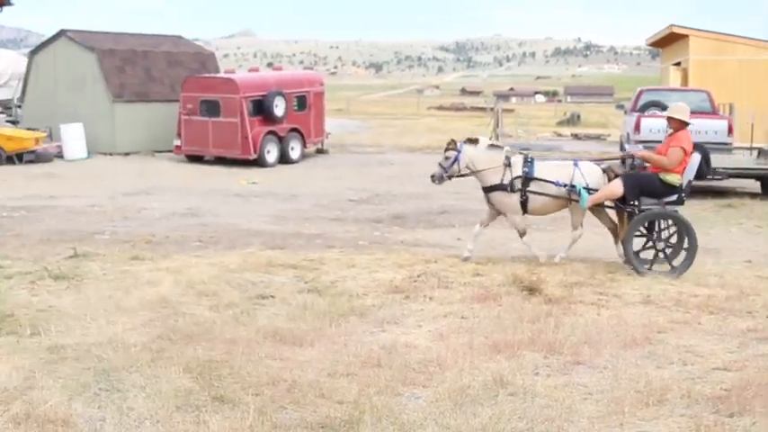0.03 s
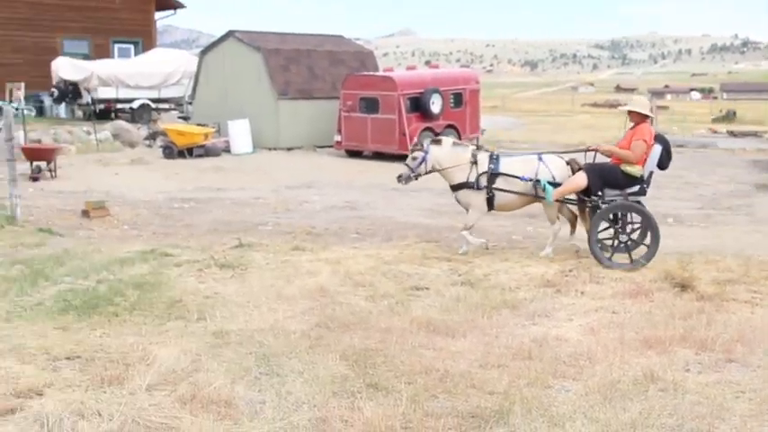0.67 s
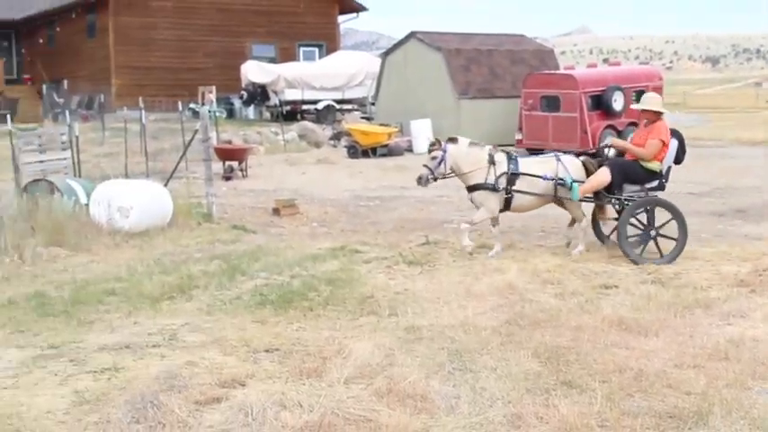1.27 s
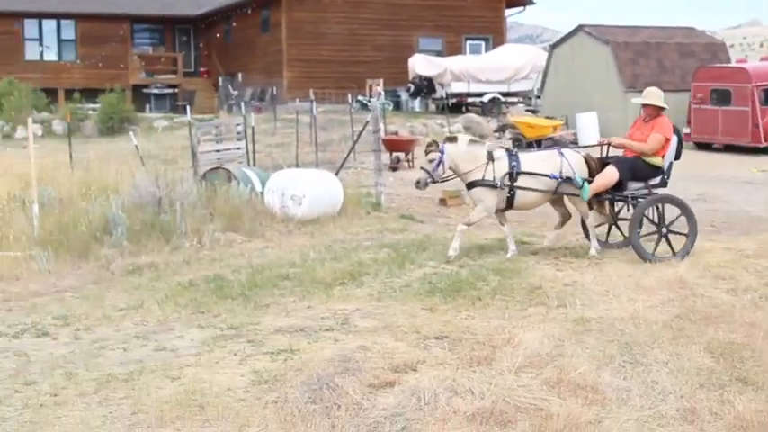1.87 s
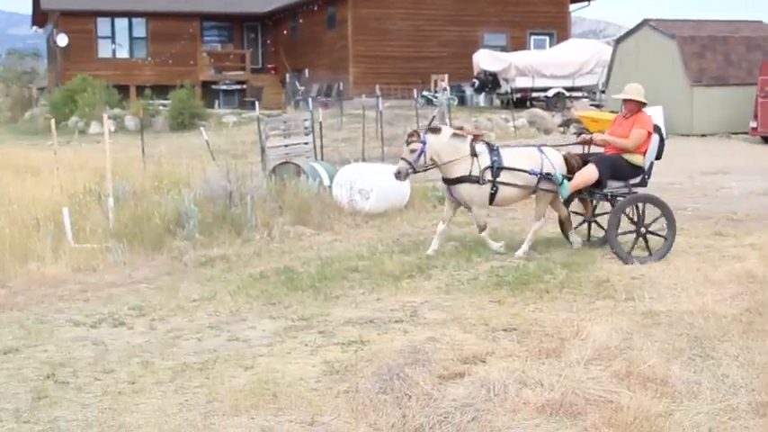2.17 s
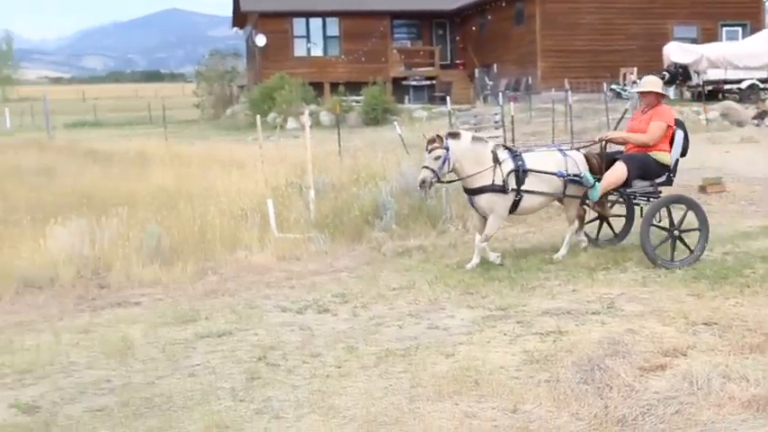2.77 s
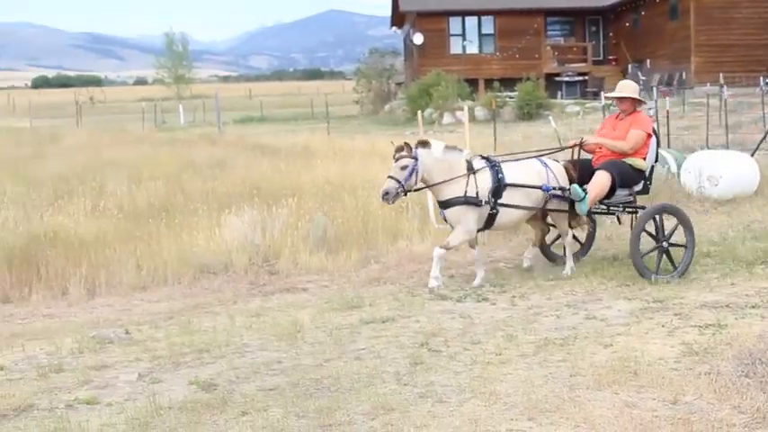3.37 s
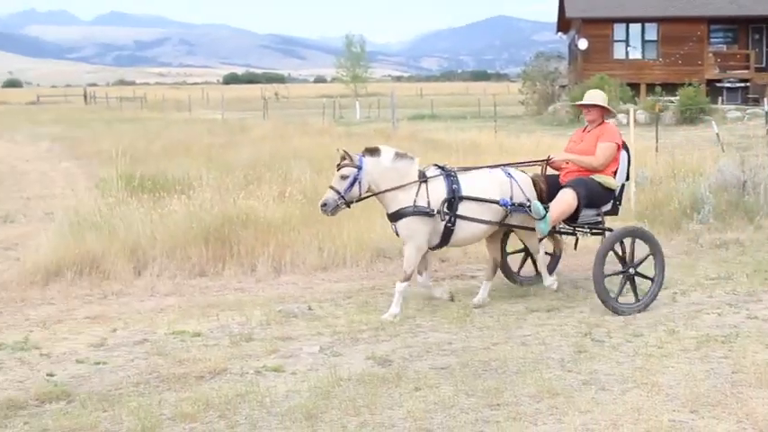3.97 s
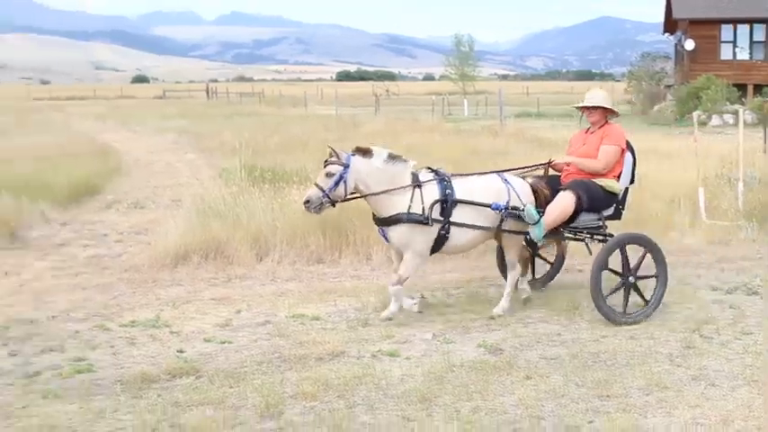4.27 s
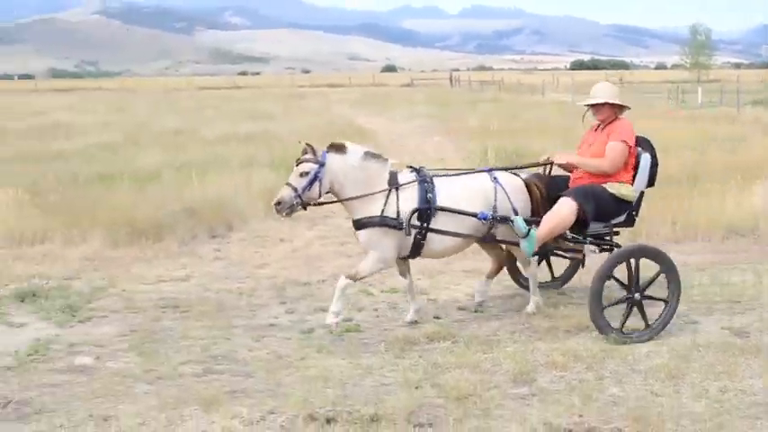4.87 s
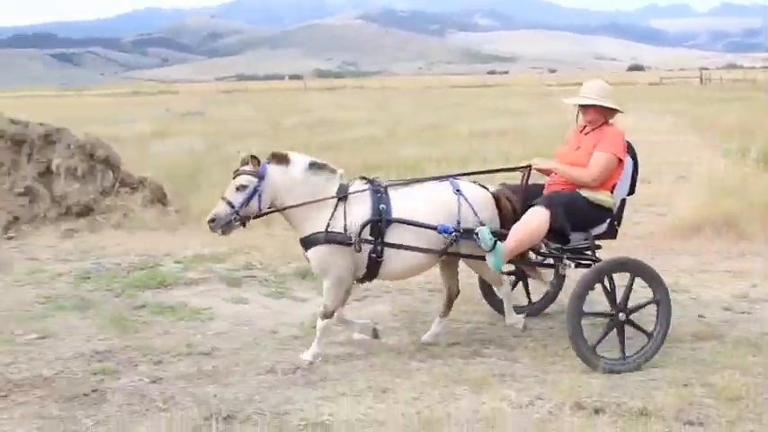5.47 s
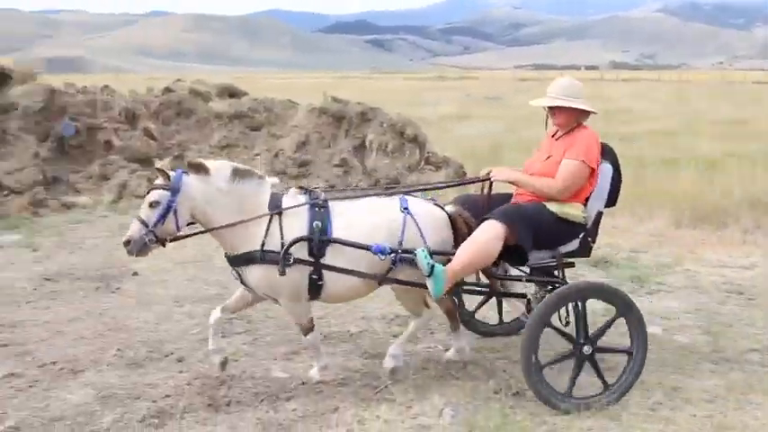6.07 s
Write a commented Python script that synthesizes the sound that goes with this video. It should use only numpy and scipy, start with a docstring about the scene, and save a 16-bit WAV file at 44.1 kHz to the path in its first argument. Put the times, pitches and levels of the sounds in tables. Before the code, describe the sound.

In an open field, a small cart rolls nearer behind a trotting pony, with gritty hoofbeats, a continuous tyre crunch and irregular clicks and rattles. Crickets trill faintly, and a thin grasshopper buzz fades about when the cart gives one hard, ringing knock. The rolling then becomes louder and crisper, with sharper clinks from the frame, while low gusts of wind buffet the microphone through the last third.

```python
"""A pony trots far off over dry grass and grit, pulling a two-wheeled cart: hooves scuff, tyres crunch,
and impacts and stick-slip friction make the cart knock and squeak. Crickets trill in a faint hiss.
Grasshoppers buzz, then fade after 2 s, as a hard knock leaves the frame ringing. From 3 s the cart
draws close and its crunch grows louder and brighter. From 4 s turbulent gusts rumble strongly on the
microphone, easing just before the end at 6 s."""
import sys
import numpy as np
from scipy import signal
from scipy.fft import rfft, irfft, next_fast_len
from scipy.io import wavfile

SR = 44100
rng = np.random.default_rng(int(sys.argv[2]) if len(sys.argv) > 2 else 0)


def wav_record(signal):
    """Record a signal, one row per channel, as 16-bit PCM in the file named by sys.argv[1]."""
    frames = np.transpose(np.atleast_2d(signal))
    bounded = np.clip(frames, -1, 1)
    # unit amplitude maps onto the largest positive 16-bit level
    quanta = np.round(bounded * 32767).astype(np.int16)
    wavfile.write(sys.argv[1], SR, quanta)


N = 270333
TIME = np.arange(N) / SR


# hoof landings, about four a second: t/s, level/dB, duration/s
LANDINGS = [(0.057, -50, 0.036), (0.232, -43, 0.051), (0.834, -44, 0.033), (1.066, -50.5, 0.058),
            (1.386, -55, 0.084), (1.667, -50, 0.02), (1.881, -46.5, 0.014), (2.47, -46.5, 0.04),
            (2.619, -42, 0.043), (2.858, -46, 0.071), (3.094, -46.5, 0.058), (3.347, -49, 0.028),
            (3.587, -49.5, 0.046), (3.855, -47, 0.041), (3.925, -42.5, 0.017), (4.055, -54, 0.029),
            (4.346, -51.5, 0.073), (4.593, -42.5, 0.046), (4.64, -40.5, 0.037), (4.7, -39.5, 0.031),
            (4.822, -43, 0.15), (5.081, -51, 0.013), (5.338, -44.5, 0.073), (5.814, -41.5, 0.041)]
def footfalls():
    """Paired excitation, a landing and a lighter flick: rows of t/s, body/dB, treble/dB, duration/s."""
    rows = []
    for s, db, length in LANDINGS:
        grit_db = by_distance(s, far=-56.5, near=-45)
        rows.append((s, db, grit_db, length))
        rows.append((s + 0.14, db - 15, grit_db - 1.5, 0.048))  # the hoof lifts through the grass
    return rows


# spectrum of a gritty scuff: f/Hz, level/dB
SCUFF_SPECTRUM = [(150, -3.5), (470, -2.5), (750, 6), (1150, 4.5), (1550, -2.5), (1900, 5), (2400, -6),
                  (3000, -7.5), (5500, -7.5), (6900, -8), (9000, -21.5), (15000, -41)]
# hollow modes of the cart, shaken by each step: f/Hz, bandwidth/Hz, level/dB
RATTLE_MODES = [(928, 94, 4.5), (1092, 68, -1), (1847, 194, 9.5), (3140, 92, -1)]
def hooves():
    """Forced vibration: each hoof crushes grit, and the swell of grains drives the modes of the cart."""
    out, t = np.zeros(N), np.arange(8192) / SR
    for s, body_db, treble_db, length in footfalls():
        u = t / length
        grit = crackle(len(t), per_s=2700, spread_db=1.5, decay_s=0.00056)
        grit = grit * u ** 0.33 * np.exp(-1.9 * u ** 2)
        scuff, treble = split(colour(grit, SCUFF_SPECTRUM))
        rattle = unit(sum(amp(db) * resonate(grit, hz, width) for hz, width, db in RATTLE_MODES))
        rattle_share = np.interp(s, [3.0, 4.2], [.72, .35])  # close by, the scuff covers more of it
        body = np.sqrt(1 - rattle_share) * scuff + np.sqrt(rattle_share) * rattle
        add(out, s, (amp(body_db) * body + amp(treble_db) * treble) * np.sqrt(length / t[-1]))
    return out


# impacts of loose joints: t/s, body level/dB, treble level/dB, joint f/Hz, chatter duration/s
JOINT_IMPACTS = [(0.058, -49, -50, 5800, 0.0023), (0.109, -53, -45.5, 5880, 0.0033),
                 (0.992, -39, -47.5, 1190, 0.01), (1.055, -46, -45.5, 5230, 0.009),
                 (1.368, -37, -62, 1280, 0.0044), (1.454, -44, -37, 6340, 0.0088),
                 (1.472, -36.5, -43.5, 1270, 0.011), (1.625, -47, -46, 1470, 0.0051),
                 (2.001, -51, -46.5, 4940, 0.0088), (2.25, -26, -32, 1800, 0.0072),
                 (2.284, -56, -42, 5000, 0.002), (2.695, -41.5, -41.5, 2930, 0.0065),
                 (2.707, -43, -42, 6900, 0.012), (2.975, -45, -45, 1110, 0.0083),
                 (3.322, -41.5, -63, 1500, 0.0027), (3.416, -42, -43.5, 6400, 0.0052),
                 (3.607, -42.5, -42.5, 4770, 0.0092), (3.914, -49, -40, 6620, 0.0018),
                 (4.174, -35.5, -35.5, 4660, 0.003), (4.328, -38, -37, 6600, 0.016),
                 (4.719, -44, -35.5, 6900, 0.0018), (4.81, -35.5, -23, 6760, 0.013),
                 (4.917, -38, -21, 7150, 0.0017), (5.495, -42, -42, 2050, 0.003),
                 (5.508, -37.5, -38, 6900, 0.0055), (5.807, -40.5, -39, 6650, 0.0064),
                 (5.886, -30, -40.5, 1180, 0.013), (5.932, -37.5, -35.5, 6360, 0.0086),
                 (5.978, -32.5, -26.5, 4860, 0.012), (6.057, -33, -45, 764, 0.002)]
# modes of the frame: f/Hz, level/dB, T60/s
FRAME_MODES = [(546, -17, 0.042), (830, -9, 0.079), (1240, 5.5, 0.012), (1815, 1, 0.043), (2170, 3, 0.0062),
               (2730, -12, 0.031), (3050, -6, 0.024), (4170, 1, 0.0081), (4700, 12, 0.0034),
               (6480, 1.5, 0.012), (7020, -6.5, 0.046), (8430, 1, 0.018)]
# radiation efficiency of the thin frame: f/Hz, level/dB
FRAME_RADIATION = [(150, -40), (350, -14), (600, -2.5), (1200, -3), (2700, 2), (7200, 6.5), (9500, -5),
                   (15000, -24)]
# single parts left ringing by a hard knock: t/s, level/dB, f/Hz, T60/s
RINGING_PARTS = [(2.252, -36.5, 5025, 0.28), (2.251, -25, 2730, 0.037), (2.253, -33, 1280, 0.045),
                 (3.369, -38, 790, 0.037), (4.812, -31, 4720, 0.079), (5.932, -29, 720, 0.057),
                 (5.981, -35, 4900, 0.086), (6.068, -31, 930, 0.34)]
def knocks():
    """Impact excitation: a joint chatters for milliseconds, and joint and frame ring in damped modes."""
    out, t = np.zeros(N), np.arange(4096) / SR
    for s, body_db, treble_db, joint_hz, chatter in JOINT_IMPACTS + ticks():
        u = t / chatter
        contacts = grains(len(t), per_s=12000, spread_db=-0.5) * u ** 0.056 * np.exp(-u ** 2)
        contacts[0] += 0.0085 / chatter  # a short knock is one clean blow
        ring = np.zeros(len(t))
        for hz, db, t60 in FRAME_MODES:
            detuned_hz = hz * (1 + rng.standard_normal() / 150)
            ring += amp(db - 60 * t / t60) * np.cos(2 * np.pi * detuned_hz * t)
        ring[0] += 30  # the bare click of the contact
        frame = unit(signal.fftconvolve(contacts, ring)[:len(t)])
        joint = resonate(contacts, joint_hz, width_hz=170 + 0.05 * joint_hz)
        scatter = 0.0079 * rng.standard_normal(len(t)) * amp(-60 * t / 0.18)  # off ground and cart
        scatter[0] = 1  # direct sound
        hit = signal.fftconvolve(frame + 0.35 * joint, scatter)[:len(t)]
        body, treble = split(colour(hit, FRAME_RADIATION))
        add(out, s, (amp(body_db) * body + amp(treble_db) * treble) * np.sqrt(0.0095 / t[-1]))
    t = np.arange(SR // 2) / SR
    for s, db, hz, t60 in RINGING_PARTS:
        add(out, s, amp(db - 60 * t / t60) * np.sin(2 * np.pi * hz * t))
    return out


# rolling noise, which snaps and ticks also follow: t/s, level/dB
ROLLING_LEVEL = [(0.0, -50.5), (0.32, -48), (0.94, -49.5), (1.45, -49), (2.01, -49.5), (2.59, -48),
                 (2.8, -47), (3.65, -47), (3.84, -46), (3.99, -44), (4.61, -45), (4.85, -39.5),
                 (5.09, -41.5), (5.82, -41.5), (6.04, -39.5), (6.13, -38.5)]
# tyre spectra far off and close by: f/Hz, level/dB
TYRE_FAR = [(180, -10.5), (300, -0.5), (482, -4.5), (691, 2), (975, -3.5), (1090, 2.5), (1570, -0.5),
            (1910, 2), (2320, -5.5), (4850, -5.5), (5620, -9), (6730, -4), (8050, -10.5), (9800, -14),
            (15000, -34)]
TYRE_NEAR = [(300, -4), (480, -6.5), (700, 2), (1100, -5.5), (1900, -0.5), (2500, -5.5), (3500, -5.5),
             (4800, 0.5), (5600, -5), (6900, 3), (8000, -4), (9500, -15), (12000, -24.5), (15000, -40)]
def tyres():
    """Rolling noise: many small fractures of dry grass add up to a crunch, brighter as the cart nears."""
    clumps = amp(wander(rate_hz=34))
    stalks = crackle(N, per_s=1100, spread_db=3.5, decay_s=0.00077)
    crunch = clumps * (stalks + 0.92 * rng.standard_normal(N))
    far_body, far_treble = split(colour(crunch, TYRE_FAR))
    near_body, near_treble = split(colour(crunch, TYRE_NEAR))
    nearness = by_distance(TIME, far=0, near=1)
    body = unit((1 - nearness) * far_body + nearness * near_body)
    treble = unit((1 - nearness) * far_treble + nearness * near_treble)
    body *= amp(by_distance(TIME, far=-3.5, near=-4.5))
    treble *= amp(by_distance(TIME, far=-7, near=-5))
    uneven_ground_db = 0.93 * wander(rate_hz=6.3)
    return (body + treble) * amp(curve(ROLLING_LEVEL) + uneven_ground_db)


# spectrum of a snapping stalk: f/Hz, level/dB
SNAP_SPECTRUM = [(300, -33), (1500, -6), (3500, -2), (7000, 7), (10000, -6), (12000, -18), (15000, -51)]
def snaps():
    """Brittle fracture: single stalks break under hooves and tyres, each with a bright tick."""
    breaks = crackle(N, per_s=18, spread_db=0.5, decay_s=0.0019)
    level_db = curve(ROLLING_LEVEL) + by_distance(TIME, far=-14.5, near=-20.5)
    return unit(colour(breaks, SNAP_SPECTRUM)) * amp(level_db)


def ticks(per_s=2.5, spread_db=2.5, chatter_s=0.0064):
    """Random impacts of buckles and small fittings, louder close by: rows as in JOINT_IMPACTS."""
    gap, force, pitch = rng.random((60, 3)).T
    times = np.cumsum(.3 + 1.4 * gap) / per_s
    levels = np.interp(times, TIME, curve(ROLLING_LEVEL)) + spread_db * (2 * force - 1)
    pitches_hz = np.interp(pitch, [0, 1], [1870, 6800])
    return [(s, db - 4, db - 3.5, hz, chatter_s)
            for s, db, hz in zip(times, levels, pitches_hz) if s < TIME[-1]]


# dry rubs of springs and harness: t/s, level/dB, f/Hz, duration/s
RUBS = [(0.314, -49.5, 1320, 0.061), (0.597, -47.5, 3500, 0.063), (0.725, -52.5, 1360, 0.064),
        (1.102, -57, 1350, 0.088), (1.601, -52.5, 1420, 0.036), (1.934, -55, 3580, 0.041),
        (1.976, -55.5, 1400, 0.061), (2.2, -54, 1370, 0.057), (3.958, -48.5, 3380, 0.037),
        (6.059, -47.5, 910, 0.038)]
def squeaks():
    """Stick-slip friction: a short dry scrape leads into one rough resonance that sags in pitch."""
    out = np.zeros(N)
    for s, db, hz, length in RUBS:
        u = np.arange(round(2 * length * SR)) / (length * SR)
        slips = rng.standard_normal(len(u))
        rub = resonate(slips, hz * (1.03 - 0.03 * u), width_hz=0.25 * hz)
        scrape = 1.2 * np.exp(-u / 0.59) * resonate(slips, 0.83 * hz, width_hz=0.87 * hz)
        add(out, s - .004, amp(db) * unit((rub + scrape) * u * np.exp(-2.2 * u ** 2)))
    return out


# breeze between gusts: t/s, level/dB
BREEZE_LEVEL = [(0, -63), (0.6, -75), (0.9, -73), (2.2, -73), (2.8, -52), (3.5, -78), (3.8, -58.5),
                (4.2, -49), (5.3, -46), (5.8, -53), (6.13, -70)]
# Gaussian gusts: peak t/s, level/dB, 1/e half-width/s
GUST_PEAKS = [(0.383, -49, 0.042), (0.566, -42, 0.022), (1.831, -47, 0.024), (2.6, -65, 0.067),
              (2.778, -41.5, 0.037), (2.961, -45, 0.022), (3.112, -45, 0.035), (3.929, -40, 0.033),
              (4.145, -34.5, 0.054), (4.313, -36, 0.089), (4.543, -37, 0.014), (4.723, -37.5, 0.03),
              (5.053, -30, 0.053), (5.363, -29, 0.035), (5.614, -29.5, 0.025), (5.726, -35.5, 0.05)]
# spectrum of the eddies: f/Hz, level/dB
EDDY_SPECTRUM = [(12, -21), (30, -22), (60, -6), (110, 2), (160, -1.5), (230, -10), (330, -16.5),
                 (430, -34), (800, -45), (2000, -66)]
# sudden low buffets: t/s, relative level/dB, f/Hz
WIND_BUFFETS = [(0.746, -46, 270), (2.319, -43, 260), (2.567, -44.5, 240), (3.378, -43, 98),
                (3.613, -43.5, 171), (4.057, -35.5, 200), (4.324, -24.5, 150), (5.385, -34.5, 220),
                (5.819, -34, 203), (6.06, -38, 227)]
def wind():
    """Turbulence: pressure fluctuations at the microphone rumble with each gust and thump in buffets."""
    gust_power = sum(amp(db) ** 2 * np.exp(-((TIME - s) / half) ** 2) for s, db, half in GUST_PEAKS)
    wind_db = 10 * np.log10(amp(curve(BREEZE_LEVEL)) ** 2 + gust_power)
    eddies = unit(colour(rng.standard_normal(N), EDDY_SPECTRUM))
    eddies *= amp(wind_db - 6 + 2 * wander(rate_hz=21))
    deep_db = np.minimum(wind_db - 3.5, -50)  # the deepest rumble stops growing in strong gusts
    deep = resonate(rng.standard_normal(N), hz=55.7, width_hz=69) * amp(deep_db)
    out = eddies + deep
    t = np.arange(4096) / SR
    u = t / 0.0078  # a buffet peaks after 7.8 ms
    for s, db, hz in WIND_BUFFETS:
        thump = unit(resonate(rng.standard_normal(len(t)), hz, width_hz=178) * u * np.exp(1 - u))
        add(out, s - .005, amp(db - 12) * thump)
    return out


# spectrum of the open air: f/Hz, level/dB
AIR_SPECTRUM = [(24, -20), (40, 2.5), (401, -3), (1570, -6.5), (1820, -9), (2520, -10.5), (2990, -37),
                (3390, -19), (6620, -10), (11400, -38), (15000, -36)]
def air():
    """Ambient noise: a faint, steady broadband hiss."""
    return amp(-59.5) * unit(colour(rng.standard_normal(N), AIR_SPECTRUM))


# trill of distant crickets: t/s, level/dB
CRICKET_LEVEL = [(0, -61.5), (1.5, -60.5), (2.8, -71), (4, -61), (6.13, -80)]
def crickets():
    """Superposition: the nearest cricket is a thin tone, and the rest merge into narrow-band noise."""
    nearest = np.sin(2 * np.pi * np.cumsum(2958 + 7 * wander(rate_hz=17.3)) / SR)
    chorus = resonate(rng.standard_normal(N), hz=2967, width_hz=100)
    return amp(curve(CRICKET_LEVEL)) * (nearest + 0.34 * chorus)


# buzz of two grasshoppers: t/s, level of the lower/dB, level of the higher/dB
GRASSHOPPER_LEVELS = [(0, -73, -88), (1.25, -73, -84), (1.5, -64.5, -74), (1.905, -60.5, -76),
                      (1.925, -72, -73), (2.35, -84, -73), (2.6, -97, -92), (6.13, -94, -95)]
def grasshoppers():
    """Stridulation: each stroke of leg on wing modulates the amplitude of two high noise bands."""
    stroke_hz = 40.5 + .6 * wander(rate_hz=5)
    rasp = unit(1 + 0.53 * np.cos(2 * np.pi * np.cumsum(stroke_hz) / SR))
    lower = resonate(rng.standard_normal(N), hz=10900, width_hz=3600) * amp(curve(GRASSHOPPER_LEVELS, 1))
    higher = resonate(rng.standard_normal(N), hz=13100, width_hz=1700) * amp(curve(GRASSHOPPER_LEVELS, 2))
    return rasp * (lower + higher)


def by_distance(s, far, near):
    """Linear transition from the far value to the near one as the cart approaches."""
    return np.interp(s, (3.07, 5.63), (far, near))


def grains(size, per_s, spread_db):
    """Poisson process: clicks of random size and sign at random times."""
    sizes = amp(spread_db * np.minimum(rng.exponential(1, size), 4.5))
    return unit(sizes * rng.choice([-1, 1], size) * (rng.random(size) < per_s / SR))


def crackle(size, per_s, spread_db, decay_s):
    """Acoustic emission: each splintering stalk gives a tiny, exponentially decaying noise burst."""
    retention = np.exp(-1 / (decay_s * SR))
    power = signal.lfilter([1], [1, -retention], grains(size, per_s, spread_db) ** 2)
    return unit(np.sqrt(power) * rng.standard_normal(size))


def resonate(x, hz, width_hz):
    """Resonance: two one-pole stages centred on hz, which may be a curve."""
    turn = np.exp(2j * np.pi * np.cumsum(hz * np.ones(len(x))) / SR)
    r = np.exp(-np.pi * width_hz / SR)
    return unit((turn * signal.lfilter([1], [1, -2 * r, r * r], x / turn)).real)


def colour(x, spectrum):
    """Causal filtering: the phase follows from the log gain by the Hilbert transform."""
    size = next_fast_len(len(x) + 2048) * 2
    hz, db = np.transpose(spectrum)
    log_hz = np.log(abs(np.fft.fftfreq(size, 1 / SR)) + 1)
    log_gain = np.log(amp(np.interp(log_hz, np.log(hz), db)))
    response = np.exp(np.conj(signal.hilbert(log_gain)))
    return np.fft.ifft(np.fft.fft(x, size) * response).real[:len(x)]


def split(x, crossover_hz=3000):
    """Crossover filtering into body and treble, each at rms 1."""
    return [unit(signal.sosfilt(signal.butter(4, crossover_hz, kind, fs=SR, output="sos"), x))
            for kind in ("low", "high")]


def wander(rate_hz):
    """Low-pass noise: a smooth random fluctuation of rms 1."""
    hz = np.fft.rfftfreq(N, 1 / SR)
    return unit(irfft(rfft(rng.standard_normal(N)) * np.exp(-(hz / rate_hz) ** 2), N))


def curve(rows, column=1):
    """Linear interpolation of one table column in time."""
    rows = np.array(rows, float)
    return np.interp(TIME, rows[:, 0], rows[:, column])


def amp(db):
    """Decibels to amplitude ratio."""
    return 10 ** (np.asarray(db) / 20)


def unit(x):
    """Normalisation to rms 1."""
    return x / np.sqrt(np.mean(x ** 2) + 1e-20)


def add(mix, s, sound):
    """Superposes a sound on the mix at time s."""
    part = mix[max(0, round(s * SR)):][:len(sound)]
    part += sound[:len(part)]


def scene():
    """Superposition of pony, cart, wind and field at one microphone."""
    pony_and_cart = amp(-1.6) * knocks() + amp(-0.14) * hooves() + squeaks() + tyres() + snaps()
    return (pony_and_cart + wind() + air() + crickets() + grasshoppers())[None]


def record(dry):
    """Band limiting: a linear-phase low-pass at 15.4 kHz."""
    lowpass = signal.firwin(511, 15400, window=("kaiser", 9), fs=SR)
    return signal.oaconvolve(dry, lowpass[None], "same")


dry = scene()
out = record(dry)
wav_record(out)
```